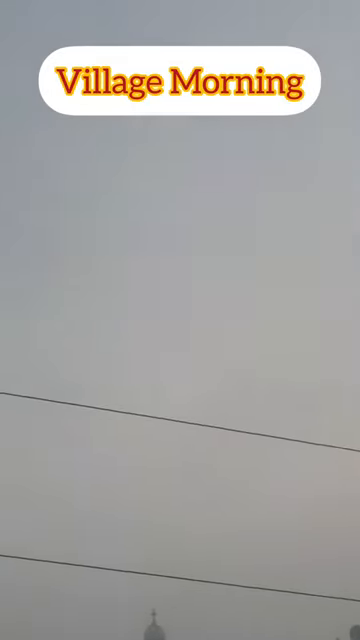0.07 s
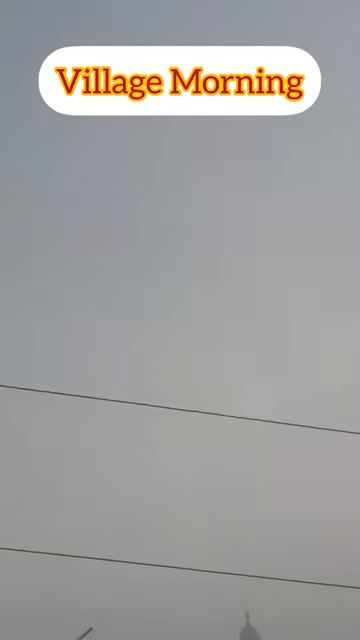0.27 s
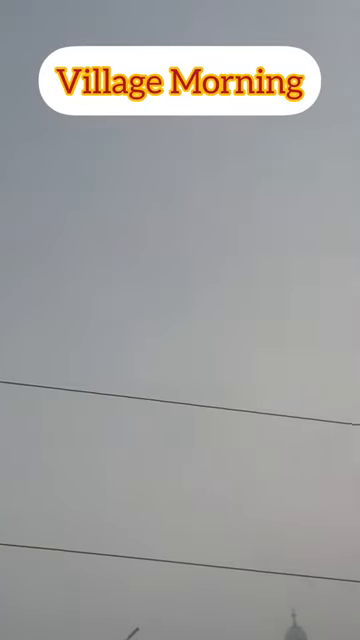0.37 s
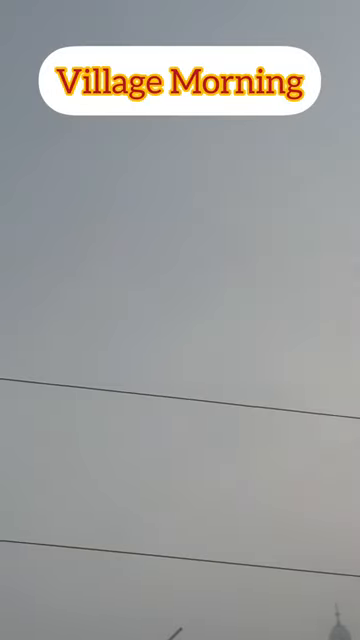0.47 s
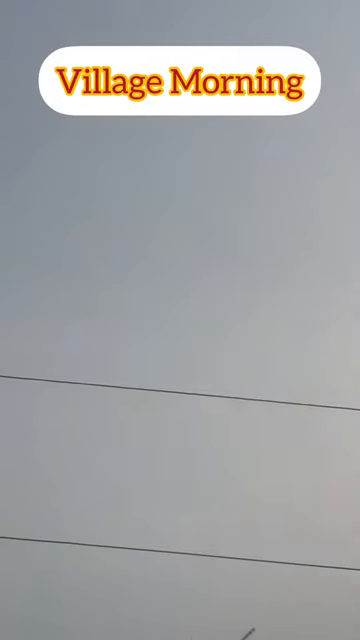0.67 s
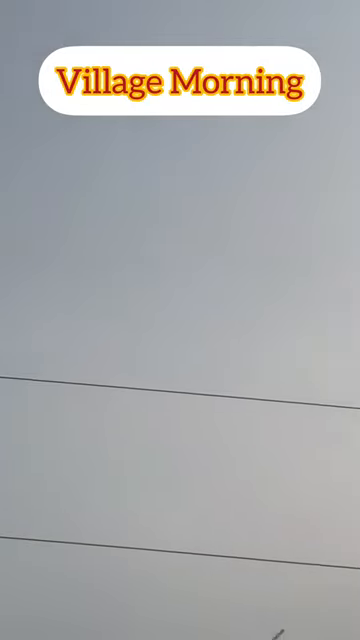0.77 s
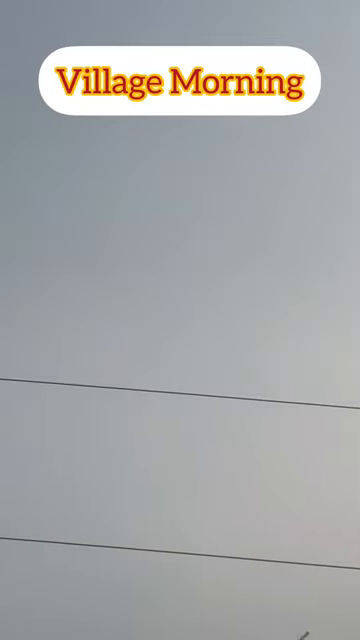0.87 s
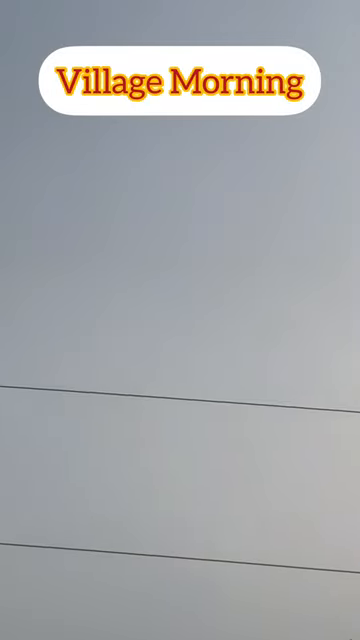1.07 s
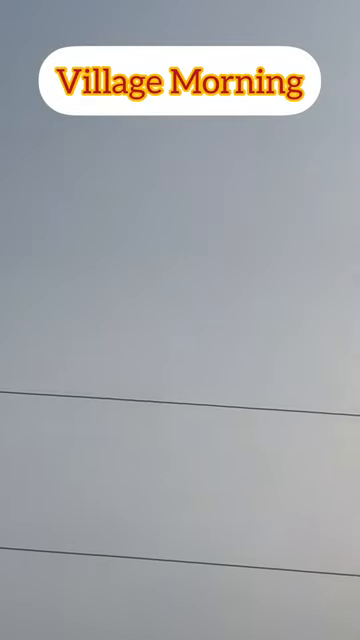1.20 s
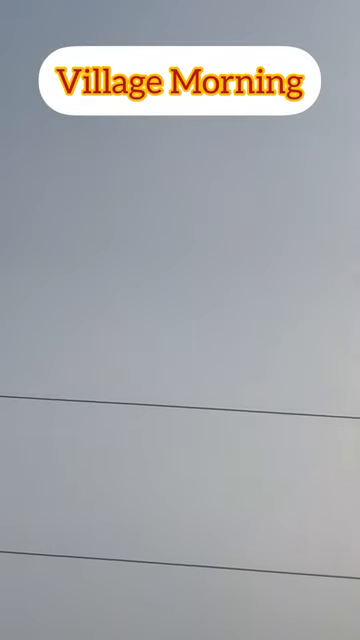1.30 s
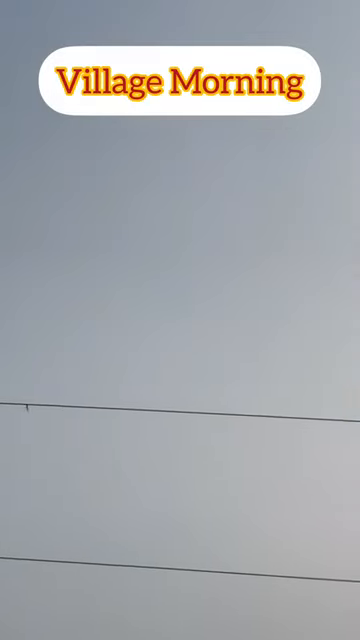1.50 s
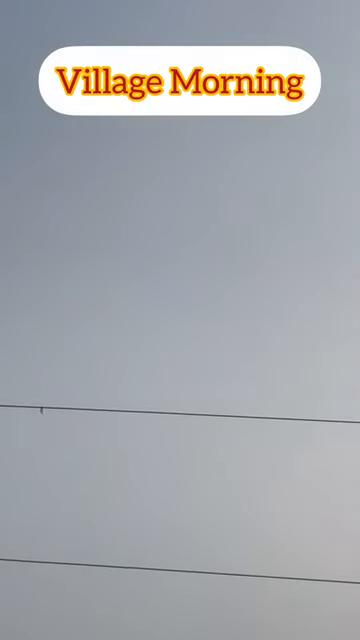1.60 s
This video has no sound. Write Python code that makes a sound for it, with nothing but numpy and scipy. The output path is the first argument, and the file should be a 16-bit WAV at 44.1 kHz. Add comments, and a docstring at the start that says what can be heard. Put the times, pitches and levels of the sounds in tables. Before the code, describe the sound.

Distant birds twitter over a faint outdoor hum as one nearby bird gives a sharp chirp.

```python
"""A low rumble, a faint hiss and a narrow, wavering drone from far away: morning in a village.
Faint clicks sound close by as far birds chatter in rough chirps, slurred whistles and one quick trill.
A soft midrange haze swells once. One near bird gives a sharp chip, both sides of its syrinx
plunging in pitch together; it echoes from the houses and dies away in the yard."""
import sys
import numpy as np
from scipy import signal
from scipy.fft import rfft, irfft, next_fast_len
from scipy.io import wavfile
from scipy.ndimage import map_coordinates

SR = 44100
rng = np.random.default_rng(int(sys.argv[2]) if len(sys.argv) > 2 else 0)


def transcribe(u):
    """Save the signal u as a 16-bit wav file named by the first command-line argument.

    u: samples, shape (n,) or (channels, n), limited to [-1, 1]; the rate is SR.
    q: integer samples, one column per channel.
    """
    v = np.clip(np.atleast_2d(u).T, -1, 1)
    q = np.round(v * 32767).astype(np.int16)
    wavfile.write(sys.argv[1], SR, q)


N = 72765
TIME_S = np.arange(N) / SR


def amp(db):
    """Decibels to gain."""
    return 10 ** (np.asarray(db) / 20)


def unit_rms(x):
    """Scale to rms 1."""
    return x / np.sqrt(np.mean(x ** 2) + 1e-20)


def over_time(points):
    """Interpolate (time [s], value) points at every sample."""
    return np.interp(TIME_S, *np.transpose(points))


def over_hz(points, hz):
    """Interpolate (frequency [Hz], value) points on a log axis."""
    knots_hz, values = np.transpose(points)
    return np.interp(np.log(hz + 1), np.log(knots_hz + 1), values)


def wobble(rate_hz):
    """Smooth random curve, rate_hz knots a second."""
    return map_coordinates(rng.standard_normal(4096), [TIME_S * rate_hz], mode="wrap")


def filtered(x, response):
    """Apply a frequency response."""
    size = next_fast_len(N + SR // 2)
    return irfft(rfft(x, size) * response(np.fft.rfftfreq(size, 1 / SR)), size)[:N]


def noise(spectrum):
    """Coloured noise, rms 1."""
    return unit_rms(filtered(rng.standard_normal(N), lambda hz: amp(over_hz(spectrum, hz))))


# Still air (frequency [Hz], relative density [dB])
AIR_SPECTRUM = [(20, -26), (32, -16.5), (48, 2), (70, 0.5), (120, -2.5), (280, -4), (480, -11.5),
                (680, -10), (900, -13.5), (1200, -10.5), (2400, -11), (4500, -13.5), (6300, -17.5),
                (7400, -29), (9500, -30.5), (15500, -26)]
# Slow rise and fall (time [s], gain [dB])
AIR_SWELL = [(0, 0), (.2, 0.5), (.45, 2), (.8, .5), (1.15, -2), (1.4, 0), (1.65, -1)]
AIR_DB = -58


def air_rumble():
    """Low rumble of the air, slightly unsteady."""
    return amp(AIR_DB + over_time(AIR_SWELL) + 0.73 * wobble(13.83)) * noise(AIR_SPECTRUM)


# Hiss colour (frequency [Hz], relative density [dB])
HISS_SPECTRUM = [(4000, -25), (7000, 0), (8500, 0), (10200, -3), (12200, 2.5), (15500, -2)]
# Hiss envelope (time [s], level before gain [dB])
HISS_ENVELOPE = [(0, -74.5), (.1, -70), (.3, -66), (.5, -66), (.58, -69.5), (.65, -81), (.7, -66),
                 (.8, -69.5), (1.0, -71), (1.18, -71), (1.215, -66), (1.27, -69.5), (1.32, -64.5),
                 (1.4, -71.5), (1.44, -66.5), (1.49, -77), (1.65, -83)]
HISS_GAIN_DB = 3


def hiss():
    """Thin treble hiss that swells, sinks and flickers."""
    return amp(over_time(HISS_ENVELOPE) + HISS_GAIN_DB + 1.9 * wobble(160)) * noise(HISS_SPECTRUM)


DRONE_HZ, DRONE_WIDTH_HZ, DRONE_DB = 1286.5, 77, -67


def far_drone():
    """Narrow noise band wavering in level."""
    white = rng.standard_normal(N)
    band = filtered(white, lambda hz: 1 / (1 + 2 * ((hz - DRONE_HZ) / DRONE_WIDTH_HZ) ** 2))
    return amp(DRONE_DB + 0.65 * wobble(6)) * unit_rms(band)


# Clicks (time [s], level [dB])
CLICKS = [(.123, -52), (.214, -47), (.376, -45), (.486, -53), (0.929, -49), (1.439, -58)]


def clicks(decay_s=0.0016):
    """Faint dry noise bursts close by."""
    envelope = sum(amp(db) * (TIME_S >= start_s) * np.exp(-np.abs(TIME_S - start_s) / decay_s)
                   for start_s, db in CLICKS)
    return envelope * noise([(100, -18), (1000, -1), (3000, 1), (15000, -9)])


def scatter(x, delay_s, smear_s):
    """Late, smeared reflection from an uneven surface."""
    t = np.arange(SR // 4) / SR - delay_s
    burst = rng.standard_normal(len(t)) * (t >= 0) * np.exp(-np.abs(t) / smear_s)
    return signal.fftconvolve(x, burst / np.linalg.norm(burst))[:N]


# Yard decay (frequency [Hz], T60 [s])
YARD_T60 = [(500, .5), (3000, 0.42), (6000, 0.65), (11000, 0.34), (16000, 0.33)]


def yard(x, build_s=0.0062):
    """Diffuse tail among houses and trees; the top treble dies first."""
    hz, t, spectra = signal.stft(rng.standard_normal(SR * 3 // 4), SR, nperseg=256)
    decay = amp(-60 * t / over_hz(YARD_T60, hz)[:, None])
    onset = 1 - np.exp(-t / build_s)
    _, tail = signal.istft(spectra * decay * onset, SR, nperseg=256)
    return signal.fftconvolve(x, tail / np.linalg.norm(tail))[:N]


NOTE_ATTACK_S, NOTE_RELEASE_S = .0045, .006
NOTE_OVERTONE_DB, NOTE_EARLY_DB, NOTE_WET_DB = -29, -5.5, -6


def far_note(row, bend, flutter_db):
    """Far bird's note arching through three pitches, with reflections; bend is a share of pitch."""
    start_s, length_s, start_hz, middle_hz, end_hz, db = row
    t = TIME_S - start_s
    u = np.clip(t / length_s, 0, 1)
    hz = start_hz * (1 - u) * (1 - 2 * u) + middle_hz * 4 * u * (1 - u) + end_hz * u * (2 * u - 1)
    phase = 2 * np.pi * np.cumsum(hz * (1 + bend)) / SR
    tone = np.sin(phase) + amp(NOTE_OVERTONE_DB) * np.sin(2 * phase)
    ramp = np.clip(np.minimum(t / NOTE_ATTACK_S, (length_s - t) / NOTE_RELEASE_S), 0, 1)
    direct = amp(db + flutter_db * wobble(170)) * np.sin(np.pi / 2 * ramp) * tone
    early = scatter(direct, delay_s=0.0043, smear_s=0.012)
    return direct + amp(NOTE_EARLY_DB) * early + amp(NOTE_WET_DB) * yard(direct)


# Rough notes (time [s], length [s], start [Hz], middle [Hz], end [Hz], level [dB])
CHIRP_NOTES = [ (0.139, 0.047, 5800, 5850, 5280, -55), (0.226, 0.047, 5500, 5610, 5800, -56),
               (0.286, .060, 5200, 5100, 5300, -61), (0.341, 0.068, 5440, 4910, 4390, -51.5),
               (0.449, .036, 2900, 3444, 4130, -46), (0.475, 0.035, 4000, 3950, 3620, -50),
               (0.726, 0.036, 3900, 4000, 3150, -50), (0.877, .055, 3900, 4330, 3630, -51.5),
               (1.272, 0.0416, 4340, 4510, 4090, -56), (1.288, 0.049, 5700, 5870, 5370, -56),
               (1.307, 0.037, 3400, 3300, 3440, -53.5), (1.328, 0.027, 4300, 4080, 4750, -49),
               (1.35, 0.034, 3700, 3750, 3270, -47), (1.435, 0.046, 4700, 4980, 4660, -51.5)]


def far_chirps():
    """Fast, uneven pitch shake roughens each note."""
    return sum(far_note(row, bend=.08 * wobble(600), flutter_db=2.0) for row in CHIRP_NOTES)


# Slurred notes (time [s], length [s], start [Hz], middle [Hz], end [Hz], level [dB])
WHISTLE_NOTES = [ (.150, 0.056, 5400, 4860, 4560, -52.5), (.200, 0.038, 4600, 4900, 4970, -52.5),
                 (0.228, 0.025, 5000, 4250, 3850, -52), (0.218, 0.02, 3220, 3240, 3160, -57),
                 (0.248, .075, 4020, 4066, 4090, -54), (.356, 0.019, 5000, 6250, 8300, -51.5),
                 (0.359, 0.016, 3250, 3290, 3400, -51), (.371, 0.013, 3580, 4040, 5540, -42),
                 (.381, .023, 5110, 5800, 4500, -47.5), (0.398, .026, 4304, 3870, 3450, -45.5),
                 (0.423, .028, 3900, 3486, 2700, -54), (0.49, 0.0162, 3800, 3524, 3340, -46),
                 (.520, 0.03, 3000, 2493, 2400, -54.5), (.542, 0.045, 2450, 2680, 2500, -58),
                 (0.715, 0.037, 2070, 2540, 2330, -57), (0.806, 0.031, 3630, 3325, 3180, -51),
                 (.848, 0.02, 3370, 3500, 3330, -55), (.886, 0.029, 2300, 2535, 2540, -55),
                 (0.912, 0.046, 3110, 2906, 2620, -56), (0.965, 0.027, 5470, 5770, 5420, -55.5),
                 (0.993, 0.025, 4595, 3900, 3100, -55.5), (1.022, 0.037, 3140, 3317, 2940, -59.5),
                 (1.063, 0.016, 3300, 2390, 1860, -55.5), (1.233, 0.079, 3154, 3180, 3120, -66.5),
                 (1.311, 0.016, 4190, 4570, 4550, -41.5), (1.377, 0.015, 4890, 5920, 6200, -49.5),
                 (1.386, 0.054, 5270, 4730, 4560, -57), (1.37, 0.048, 3450, 3253, 3150, -55.5),
                 (1.479, 0.0284, 4160, 4000, 3960, -55.5), (1.51, 0.035, 4040, 4050, 4050, -50.5),
                 (1.534, 0.026, 2946, 2314, 2170, -58.5)]


def far_whistles():
    """Clear glides with a slight quiver."""
    return sum(far_note(row, bend=.014 * wobble(420), flutter_db=2.6) for row in WHISTLE_NOTES)


# Trilled note (time [s], length [s], start [Hz], middle [Hz], end [Hz], level [dB])
TRILL_NOTE = (.215, .118, 2850, 2850, 2750, -56)


def far_trill(rate_hz=88, depth=.085):
    """One note with a quick, nearly regular pitch swing."""
    swing = np.sin(2 * np.pi * rate_hz * TIME_S + 0.61 * wobble(39.1))
    return far_note(TRILL_NOTE, bend=depth * swing, flutter_db=5.5)


# Haze envelope (time [s], level [dB])
HAZE_ENVELOPE = [(0, -99), (.45, -71), (.62, -68), (.74, -62), (.92, -62), (1.1, -80), (1.65, -90)]
# Haze colour (frequency [Hz], relative density [dB])
HAZE_SPECTRUM = [(350, -29), (560, -1), (700, -5), (950, -26), (1450, -3), (1850, 1.5), (2300, -9),
                 (3200, -35)]


def haze():
    """Faint midrange noise that swells once."""
    return amp(over_time(HAZE_ENVELOPE)) * noise(HAZE_SPECTRUM)


def syrinx_voice(contour, overtones_db, edge_s=0.00045):
    """One side of the syrinx: a gliding tone with weak harmonics from the second up."""
    times_s, hz, db = np.transpose(contour)
    phase = 2 * np.pi * np.cumsum(np.interp(TIME_S, times_s, hz)) / SR
    gate = np.clip(np.minimum(TIME_S - times_s[0], times_s[-1] - TIME_S) / edge_s, 0, 1)
    overtones = sum(amp(gain_db) * np.sin(k * phase) for k, gain_db in enumerate(overtones_db, 2))
    return gate * amp(np.interp(TIME_S, times_s, db)) * (np.sin(phase) + overtones)


# High and low sides of the syrinx (time [s], pitch [Hz], source level [dB])
HIGH_VOICE = [(.6658, 7490, -44), (.6672, 6880, -33.5), (.669, 6650, -31.5), (.6755, 6470, -37),
              (.6764, 5960, -26.5), (.6775, 4830, -52)]
LOW_VOICE = [(.6694, 5770, -46), (.6718, 5513, -23), (.6752, 5200, -30.5), (.6764, 4900, -24.5),
             (.6774, 4060, -27.5), (.6805, 3330, -54)]
# Throat response (frequency [Hz], gain [dB])
THROAT_RESPONSE = [(3000, -4), (7000, 1), (8500, 2.5), (9600, -5.5), (10800, 4), (11800, -1), (13500, -6),
                   (15500, 11)]
CHIP_RASP_DB = -22


def near_chip():
    """Two voices plunge together, slightly raspy, coloured by the throat."""
    high = syrinx_voice(HIGH_VOICE, overtones_db=[-18])
    low = syrinx_voice(LOW_VOICE, overtones_db=[-14.5, -26])
    rasp = 1 + amp(CHIP_RASP_DB) * wobble(3500)
    return filtered((high + low) * rasp, lambda hz: amp(over_hz(THROAT_RESPONSE, hz)))


# Near flat surfaces (delay [s], gain [dB])
FLAT_SURFACES = [(.0025, -18), (.0062, -6.5), (0.0112, -12), (.0168, -23), (0.0333, -12.5)]
# Rough house walls (delay [s], gain [dB], smear [s])
HOUSE_WALLS = [(0.01, -4.5, 0.0046), (.081, -15, 0.0092), (.1445, -15, .005)]
CHIP_WET_DB = -6


def chip_echoes(chip):
    """Flat surfaces mirror the chip, rough walls smear it, the yard adds a tail."""
    mirrored = filtered(chip, lambda hz: sum(amp(db) * np.exp(-2j * np.pi * hz * delay_s)
                                             for delay_s, db in FLAT_SURFACES))
    smeared = sum(amp(db) * scatter(chip, delay_s, smear_s) for delay_s, db, smear_s in HOUSE_WALLS)
    return mirrored + smeared + amp(CHIP_WET_DB) * yard(chip)


def scene():
    """Birds over the background, mono."""
    chip = near_chip()
    birds = chip + chip_echoes(chip) + far_whistles() + far_chirps() + far_trill()
    background = air_rumble() + hiss() + far_drone() + clicks() + haze()
    return (birds + background)[None]


TOP_HZ = 15850


def record(dry):
    """Brick-wall low-pass at TOP_HZ."""
    return np.array([filtered(x, lambda hz: hz < TOP_HZ) for x in dry])


dry = scene()
out = record(dry)
transcribe(out)
```